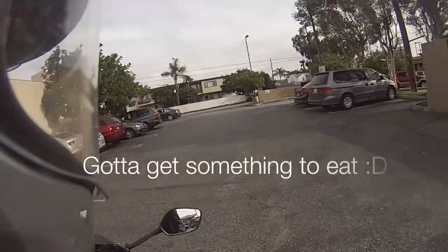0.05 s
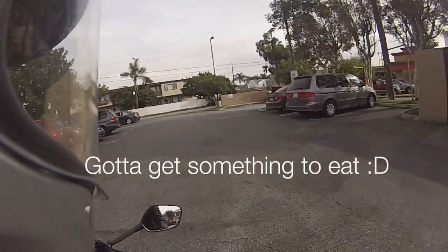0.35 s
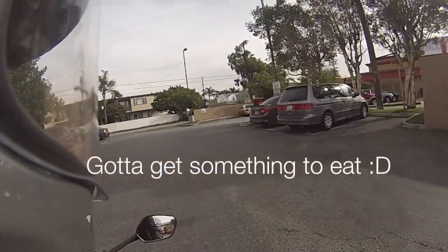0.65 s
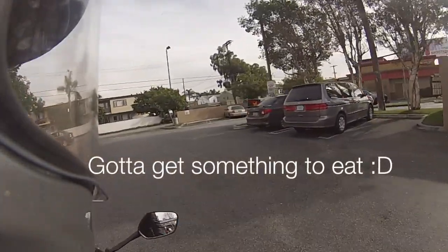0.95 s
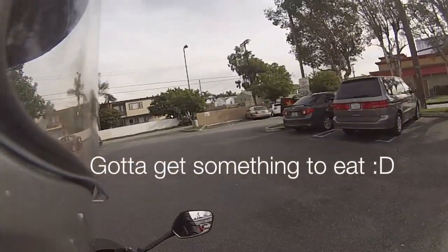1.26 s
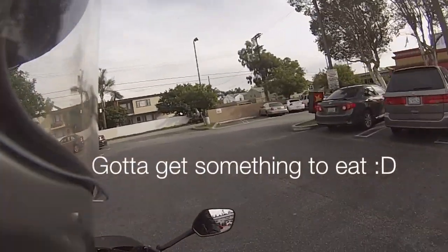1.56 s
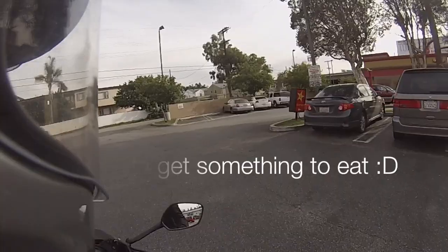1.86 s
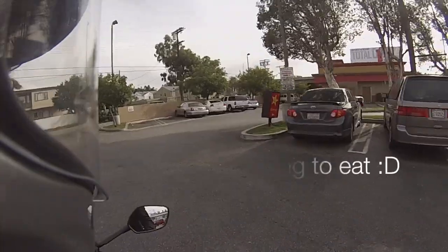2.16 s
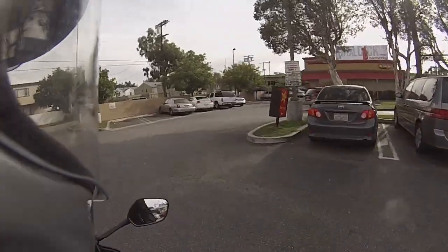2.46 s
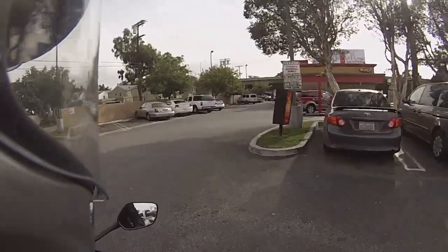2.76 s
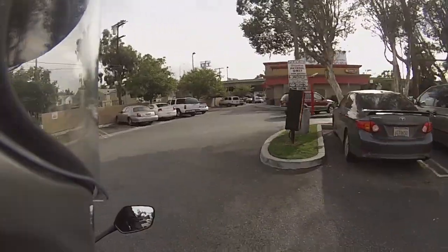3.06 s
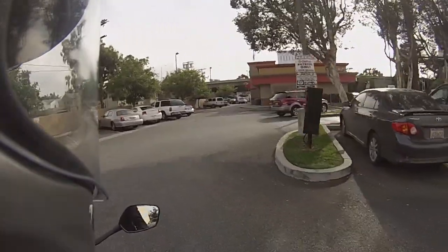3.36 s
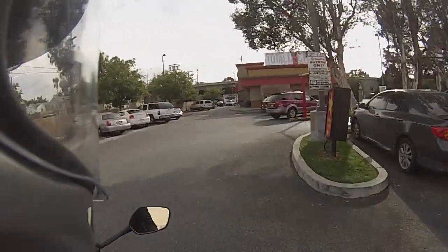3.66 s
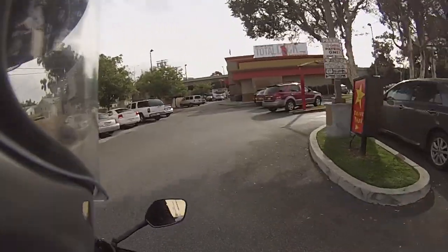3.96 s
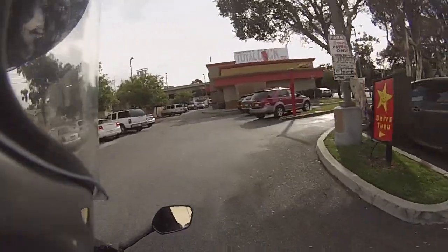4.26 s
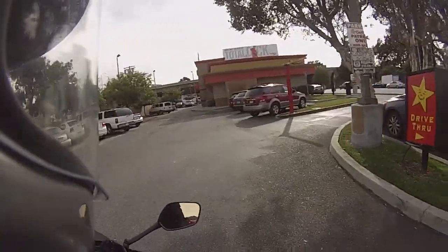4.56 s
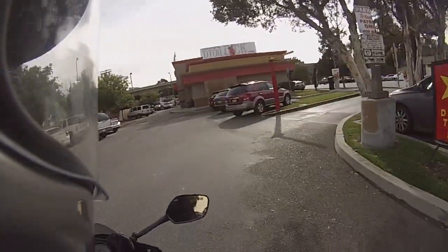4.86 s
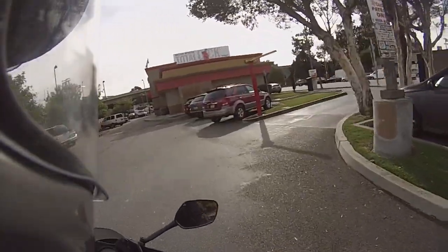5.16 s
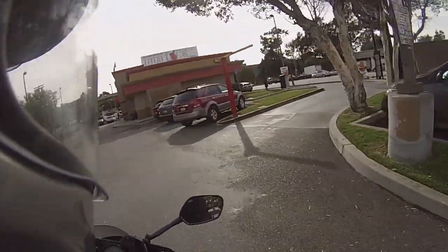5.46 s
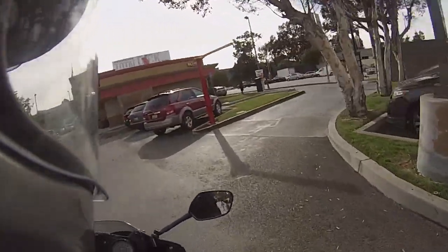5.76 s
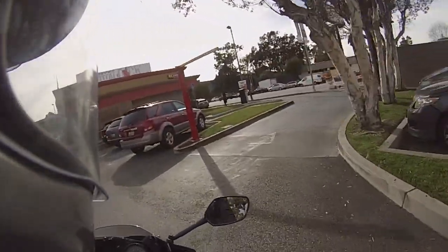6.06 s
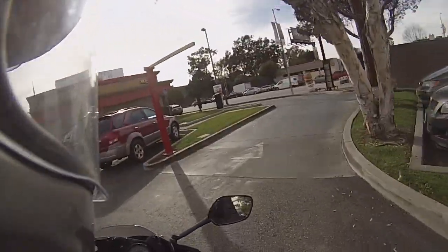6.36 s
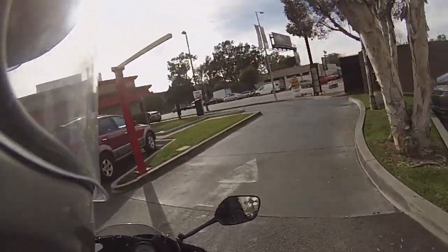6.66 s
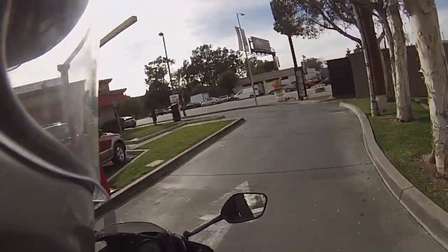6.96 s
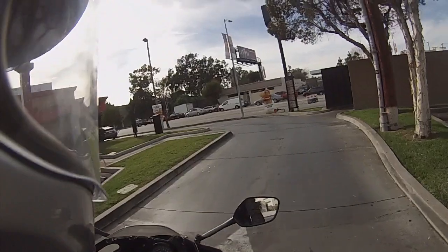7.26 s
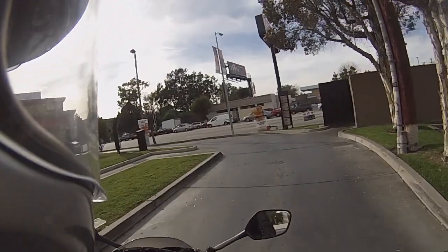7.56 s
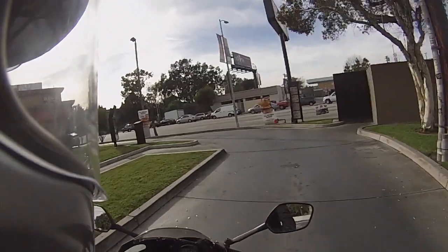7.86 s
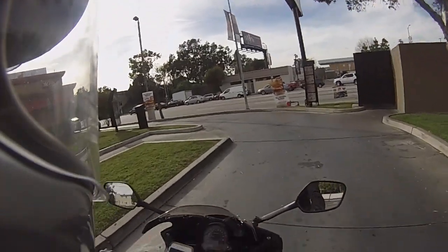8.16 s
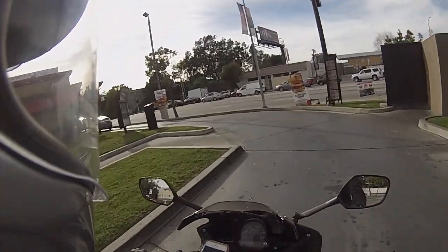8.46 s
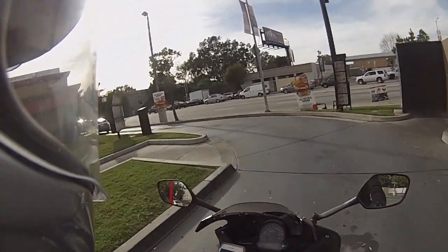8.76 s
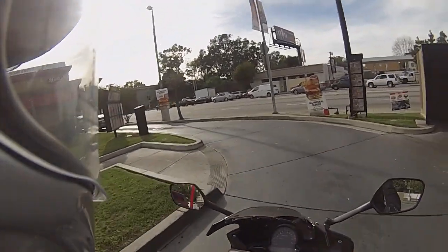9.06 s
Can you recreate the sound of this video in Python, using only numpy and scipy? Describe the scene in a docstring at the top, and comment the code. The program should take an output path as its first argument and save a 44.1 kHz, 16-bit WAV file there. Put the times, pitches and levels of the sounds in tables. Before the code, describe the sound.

A single-cylinder motorcycle rides slowly through a car park, heard from the rider's helmet. Low exhaust beats, mechanical clatter and a thin gear whine run under bassy gusts and sudden slaps of wind. The bike coasts, shifts down with a faint click and sinks to idle, then pulls away with rising pitch. It gradually slows again, and the brake pads rub softly near the end.

```python
"""A single-cylinder motorcycle rolls through a car park, heard from the rider's helmet.
From the start, gusts buffet the helmet and boom in its shell over exhaust beats, clatter and gear whine.
At 0.3 s the engine sound ducks suddenly after a loud wind slap.
The bike coasts, drops a gear at 1.7 s, idles with the clutch in and pulls away just after 4 s.
From 6 s it slows again, and after 8 s the brake pads rub on the disc."""
import sys
import numpy as np
from scipy import signal
from scipy.fft import rfft, irfft, next_fast_len
from scipy.io import wavfile
from scipy.ndimage import uniform_filter1d, minimum_filter1d, map_coordinates

SR = 44100
rng = np.random.default_rng(int(sys.argv[2]) if len(sys.argv) > 2 else 0)


def persist_wave(psi):
    """Save psi, clipped to +-1, as 16-bit WAV."""
    counts = np.round(np.clip(psi, -1, 1) * 32767).astype(np.int16)
    wavfile.write(sys.argv[1], SR, np.atleast_2d(counts).T)


N = 406602

# Drive laws: level/dB coasting at cruise, dB added per doubling of speed, dB added at full load
PUFF_LAW, DRONE_LAW = (-32.5, 0, 4.6), (-32.5, 16, 7.4)
# Tone of the exhaust pipe: f/Hz, relative level/dB
PIPE_EQ = [(15, -33), (50, -3), (75, -2.5), (120, 0.5), (170, -5), (400, -26.5), (2500, -87)]
# Silencer resonances: f/Hz, half width/Hz, relative level/dB
SILENCER_MODES = [(52.3, 3.9, -0.5), (100, 15, -3), (123.4, 4.8, -3), (163, 17, -6.5)]


def exhaust(cycle, speed, load, scatter_db, waver_db, jitter):
    """One uneven puff per firing; each low order booms as it sweeps through a silencer resonance."""
    firings = np.flatnonzero(np.diff(np.floor(cycle + jitter * wobble(22))))
    puffs = np.zeros(N)
    puffs[firings] = amp(scatter_db * rng.standard_normal(len(firings)))
    drone = np.zeros(N)
    for order in range(2, 8):
        boom = sum(amp(db) * resonance(order * speed, hz, width) for hz, width, db in SILENCER_MODES)
        waver = amp(waver_db * wobble(7.6))
        drone += boom * waver * np.sin(2 * np.pi * (order * cycle + rng.random()))
    beats = drive(PUFF_LAW, speed, load) * coloured(puffs, PIPE_EQ)
    return beats + drive(DRONE_LAW, speed, load) * drone


CLATTER_LAW, HISS_LAW = (-48.5, 8, 8.9), (-63.5, 10.4, 10.3)
# Midrange body of the engine casing: f/Hz, relative level/dB
CASING_EQ = [(150, -32.5), (400, -8.5), (620, 3.5), (875, -4.5), (1400, -5.5), (2100, -4.5), (2280, -2),
             (2600, -14), (3200, -25), (6000, -58)]
# Top-end fizz of the moving parts: f/Hz, relative level/dB
HISS_EQ = [(1800, -24.5), (2900, -1), (3550, 2.5), (3850, -4.5), (4200, 1), (4950, -3.5), (5550, 1),
           (5900, -3), (6350, -3), (6800, -9.5), (8100, -17), (9400, -9), (10600, -9), (15000, -26.5)]


def clatter(cycle, speed, load, firing_depth, crank_depth):
    """Valves, piston and chain rattle the casing, swelling at each firing and each crank turn."""
    swell = 1 + firing_depth * np.cos(2 * np.pi * cycle) + crank_depth * np.cos(4 * np.pi * cycle)
    body = coloured(noise() * swell, CASING_EQ)
    fizz = coloured(noise() * np.sqrt(np.abs(swell)), HISS_EQ)
    return drive(CLATTER_LAW, speed, load) * body + drive(HISS_LAW, speed, load) * fizz


# Fader for the loose rattle, loudest at the start, until the sound ducks at 0.3 s: t/s, level/dB
RATTLE_FADER = [(0, -40), (.28, -42), (.36, -45), (1.1, -47.5), (2.2, -62), (3.1, -53.5), (4.3, -51.5),
                (5, -50), (7.1, -53.5), (7.9, -59.5)]
# Casing modes that the rattle rings: f/Hz, half width/Hz, relative level/dB
RATTLE_MODES = [(1103, 75, 2.5), (1514, 79, -7), (2310, 65, -3.5), (3580, 110, -23)]


def rattle(cycle, lead, decay, scatter_db):
    """Loose parts chatter ahead of each firing and ring the casing; lead and decay are cycle shares."""
    bursts = np.exp(-((cycle + lead) % 1) / decay)
    chatter = noise() * bursts * amp(scatter_db * wobble(20))
    hz = np.geomspace(500, 9000, 400)
    ring = sum(amp(db) * resonance(hz, centre, width) for centre, width, db in RATTLE_MODES)
    ring_eq = np.column_stack([hz, 20 * np.log10(ring)])
    return amp(curve(RATTLE_FADER)) * coloured(chatter, ring_eq)


# Fader for the engine's hollow ring: t/s, level/dB
HOLLOW_FADER = [(0, -41.5), (2.9, -41.5), (5.1, -36), (5.35, -41), (6.1, -37), (6.6, -34), (7.8, -38),
                (9.22, -41)]


def hollow_ring(cycle, centre_hz, half_width_hz, firing_depth):
    """A hollow ring at one pitch, stirred by every firing; it carries on at idle."""
    stir = noise() * (1 + firing_depth * np.cos(2 * np.pi * cycle))
    ring = bandpass(stir, centre_hz - half_width_hz, centre_hz + half_width_hz)
    return amp(curve(HOLLOW_FADER)) * unit(ring)


GEARBOX_LAW, PRIMARY_LAW = (-51.5, 17, 7.5), (-47.5, 15, 5.7)
# Gearbox partials: multiple of the firing rate, relative level/dB
GEARBOX_ORDERS = [(52, 0), (104, 1.5), (158, -2), (209, -2.5)]
# Primary gear partials: multiple of the firing rate, relative level/dB
PRIMARY_ORDERS = [(34, -1.5), (36, -8), (65, -7), (69.5, 0), (74, -4), (139, -2)]
# Ringing tone of the engine covers: f/Hz, relative level/dB
COVERS_EQ = [(700, -3.5), (795, 18), (880, -3), (1010, -2), (1110, 7), (1190, 2), (1360, 4), (1470, -4),
             (1820, 4), (2100, -8), (2330, 5), (2650, -14), (2725, -6.5), (2810, -16), (3600, -8),
             (3880, -21.5), (4090, -9), (4300, -19.5)]


def gear_whine(cycle, speed, orders, backlash, waver_db=1.8):
    """Meshing teeth whine through the engine covers, roughened by backlash."""
    # the crank lurches each turn and wanders, smearing the high orders most, and more at speed
    lurch = .0018 * (speed / CRUISE_RATE) ** 2
    angle = cycle + lurch * (np.sin(4 * np.pi * cycle) + wobble(35) / 2)
    whine = np.zeros(N)
    for order, db in orders:
        phase = 2 * np.pi * order * angle
        gain = amp(db + waver_db * wobble(8))
        grit = wobble(130) * np.sin(phase) + wobble(130) * np.cos(phase)
        whine += gain * (np.sin(phase) + backlash * grit)
    return coloured(whine, COVERS_EQ)


# Gusts on the helmet: start t/s, length/s, level/dB
GUSTS = [(0.188, 0.17, -18.5), (0.271, 0.071, -17), (0.412, 0.075, -16.5), (0.499, 0.39, -20.5),
         (0.628, 0.051, -16), (0.971, 0.32, -17), (1.298, 0.18, -15.5), (1.468, .074, -15),
         (1.687, 0.58, -20.5), (1.776, .24, -16), (2.066, .12, -18.5), (2.31, 0.36, -23),
         (2.614, 0.31, -17.5), (3.194, 0.3, -22), (3.504, 0.47, -30.5), (3.933, 0.49, -17.5),
         (4.145, 0.14, -18), (4.804, 0.33, -23), (5.416, 0.3, -17), (5.738, 0.1, -13), (5.954, .07, -15.5),
         (6.377, 0.26, -21), (6.696, 1.9, -23), (7.325, 0.18, -17), (7.712, 0.083, -15.5),
         (8.42, 0.93, -20.5), (8.852, 0.42, -21.5)]


def gusts(calm_db):
    """Envelope of overlapping gusts over light, steady buffeting."""
    power = np.full(N, amp(calm_db) ** 2)
    for start, length, db in GUSTS:
        span, shape = gate(start, length, rise=.3, fall=.37)
        power[span] += (amp(db) * shape) ** 2
    return np.sqrt(power)


# The hardest slaps of air: t/s, envelope peak level/dB
SLAPS = [(0.307, -4.5), (0.417, -12.5), (0.45, -7), (1.179, -2.5), (1.853, -9.5), (1.975, -12),
         (2.211, -10.5), (2.677, -8), (2.755, -12.5), (2.862, -12), (3.193, -8.5), (3.21, -5.5),
         (3.248, -6), (4.059, -5.5), (4.179, -7.5), (7.411, -6.5), (7.455, -11), (7.795, -10),
         (8.198, -9.5), (8.645, -13.5), (9.135, -11.5)]


def slaps(attack_s, decay_s):
    """Envelope of air slaps that land at once and die away."""
    envelope = np.zeros(N + SR)
    near = np.arange(-SR // 10, SR // 10)
    shape = np.exp(np.minimum(near / SR / attack_s, -near / SR / decay_s))
    for s, db in SLAPS:
        envelope[round(s * SR) + near] += amp(db) * shape
    return envelope[:N]


# Bass-heavy tone of the buffeting: f/Hz, relative level/dB
BUFFET_EQ = [(40, -8), (90, -2.5), (190, -0.55), (280, -2.5), (400, -6.5), (600, -7), (830, -21),
             (1400, -41), (2200, -53), (4000, -82.5)]
# Boxy tone of the helmet shell: f/Hz, relative level/dB
SHELL_EQ = [(200, -34), (420, -9.5), (520, -4.5), (575, -3), (618, 1), (680, -6), (850, -21.5), (1300, -49),
            (3000, -86.5)]
# Fader for the shell's boom: t/s, level/dB against the buffeting
BOOM_FADER = [(0, -5.5), (1.2, -7), (2.15, -2.5), (3, -7), (4, -9), (7, -7), (8.2, -3.5), (9, -0.5)]


def helmet_wind(eddy_db, flutter_db):
    """Eddies break off the helmet in quick lumps and boom in its shell; the hardest ones slap it."""
    eddies = amp(eddy_db * wobble(190) + flutter_db * wobble(32))
    force = np.hypot(gusts(calm_db=-25.5) * eddies, slaps(attack_s=.0014, decay_s=.0073))
    buffet = coloured(noise() * force, BUFFET_EQ)
    boom = amp(curve(BOOM_FADER)) * coloured(noise() * force, SHELL_EQ)
    return np.sqrt(np.mean(force ** 2)) * (buffet + boom)


# Low end of the steady draught: f/Hz, relative level/dB
DRAUGHT_EQ = [(10, -20.5), (25, -4), (50, -3.5), (90, 0.5), (150, -8), (800, -83.5)]
# Swells of deep wind: start t/s, length/s, level/dB, centre f/Hz
SWELLS = [(0.238, .12, -19.5, 49.2), (0.699, 0.66, -19.5, 77.6), (2.699, 0.3, -19, 74),
          (3.165, .2, -17, 73), (3.347, .45, -22, 48.3), (3.948, .35, -18.5, 89), (5.424, .45, -17.5, 56),
          (6.817, .4, -18, 111), (7.216, 0.29, -19, 67.5), (7.306, 0.9, -21.5, 148),
          (7.725, .2, -18.5, 102), (8.945, .2, -21, 98)]


def wind_rumble(draught_db, band_ratio):
    """A bed of deep draught, and swells of wind that each rumble at their own pitch."""
    out = amp(draught_db) * coloured(noise(), DRAUGHT_EQ)
    for start, length, db, hz in SWELLS:
        span, shape = gate(start, length, rise=.43, fall=.43)
        band = bandpass(rng.standard_normal(N // 2), hz / band_ratio, hz * band_ratio)
        out[span] += amp(db) * shape * unit(band[:len(shape)])
    return out


# Fader for the pads pressing on the disc: t/s, level/dB
BRAKE_FADER = [(.25, -76), (.45, -58.5), (1.1, -63.5), (1.9, -70), (2.3, -78.5), (8.1, -75), (8.3, -53.5),
               (8.55, -46.5), (9.22, -47)]
# Bright ring of the brake disc: f/Hz, relative level/dB
DISC_EQ = [(1200, -23), (2200, 8.5), (2750, -0.5), (2920, 10), (3100, -2), (3700, -6.5), (5300, -3),
           (5570, 7), (5850, -5), (6400, -5), (7500, -21), (12000, -31)]


def brake():
    """The pads rub lightly on the disc as the bike slows."""
    return amp(curve(BRAKE_FADER)) * coloured(noise(), DISC_EQ)


# Gear lever clicks: peak t/s, level/dB, centre f/Hz, half width/Hz, half length/s
LEVER_CLICKS = [(1.718, -55, 1000, 8000, .014), (3.356, -67, 10500, 3000, .005)]


def gear_lever():
    """Short metallic scrapes of the gear lever and its linkage."""
    t, hz = np.arange(N) / SR, np.fft.rfftfreq(N, 1 / SR)
    out = np.zeros(N)
    for s, db, centre_hz, half_width_hz, half_length in LEVER_CLICKS:
        band = np.exp(-((hz - centre_hz) / half_width_hz) ** 2)
        scrape = unit(irfft(rfft(noise()) * band, N))
        out += amp(db) * scrape * np.exp(-((t - s) / half_length) ** 2)
    return out


CRUISE_RATE = 21  # firings per second


def drive(law, speed, load):
    """Gain of an engine layer at this speed and load."""
    coasting_db, doubling_db, load_db = law
    return amp(coasting_db + doubling_db * np.log2(speed / CRUISE_RATE) + load_db * load)


def amp(db):
    """Decibels to gain."""
    return 10 ** (np.asarray(db) / 20)


def unit(x):
    """Scale to rms 1."""
    return x / np.sqrt(np.mean(x ** 2) + 1e-20)


def noise():
    """Fresh white noise."""
    return rng.standard_normal(N)


def curve(rows):
    """Join (time, value) breakpoints, one value per sample."""
    return np.interp(np.arange(N) / SR, *np.transpose(rows))


def wobble(rate):
    """Smooth random modulation, rate knots a second."""
    coarse = np.arange(0, N + 32, 32)
    knots = rng.standard_normal(int(N * rate / SR) + 4)
    bends = map_coordinates(knots, [coarse * rate / SR])
    return unit(np.interp(np.arange(N), coarse, bends))


def gate(start, length, rise, fall):
    """Samples covered and their envelope; rise and fall are shares of the length."""
    first, last = int((start - length / 2) * SR), int((start + 1.5 * length) * SR)
    span = np.arange(max(0, first), min(N, last))
    progress = (span / SR - start) / length
    return span, np.clip(.5 + progress / rise, 0, 1) * np.clip(.5 + (1 - progress) / fall, 0, 1)


def resonance(x, centre, half_width):
    """A peak of height 1 at the centre."""
    return 1 / (1 + ((x - centre) / half_width) ** 2)


def bandpass(x, low_hz, high_hz):
    """Keep one band, with gentle slopes."""
    return signal.sosfilt(signal.butter(2, [low_hz, high_hz], "bandpass", fs=SR, output="sos"), x)


def coloured(x, eq):
    """Pass x through a body with this EQ curve; rms 1."""
    size = 2 * next_fast_len(N // 2 + 8192)
    hz, db = np.transpose(eq)
    gain = amp(np.interp(np.log(np.fft.rfftfreq(size, 1 / SR) + 1), np.log(hz), db))
    # minimum phase: the body rings only after it is struck
    cepstrum = irfft(np.log(gain))
    cepstrum[1:size // 2] *= 2
    cepstrum[size // 2 + 1:] = 0
    return unit(irfft(rfft(x, size) * np.exp(rfft(cepstrum)))[:N])


# Engine revs: t/s, firing rate f/Hz
ENGINE_SPEED = [(0, 21.9), (.35, 21.1), (1.5, 21), (1.8, 22.8), (2.2, 14.5), (2.7, 12.7), (3.8, 12.4),
                (4.2, 13.8), (4.6, 23.4), (4.95, 25.9), (5.55, 26.2), (6, 25), (7.6, 21.1), (7.9, 19.3),
                (8.2, 18.3), (8.5, 19.8), (8.8, 18.3), (9.22, 18)]
# Engine loudness, following the pull and ducking abruptly twice after loud wind peaks:
# t/s, load (0 = coasting level, about 1 = pulling level)
ENGINE_LOUDNESS = [(0, 0.83), (.3, 0.7), (.33, -0.023), (1.05, 0.26), (1.6, -0.41), (1.8, -0.066),
                   (2.2, -0.34), (3.4, 0.29), (4.05, 0.93), (4.21, .8), (4.24, -0.19), (4.6, 0.22),
                   (4.95, 0.83), (5.9, 0.81), (7.3, 1.03), (8.25, 1.08), (9.22, 1.13)]


def scene():
    """Speed and load drive exhaust, clatter and gears; wind blows over all of it."""
    speed, load = curve(ENGINE_SPEED), curve(ENGINE_LOUDNESS)
    cycle = np.cumsum(speed) / SR  # one firing and two crank turns per cycle
    engine = exhaust(cycle, speed, load, scatter_db=2, waver_db=1.5, jitter=.015)
    engine += clatter(cycle, speed, load, firing_depth=.14, crank_depth=.098)
    engine += rattle(cycle, lead=.33, decay=.42, scatter_db=1)
    engine += hollow_ring(cycle, centre_hz=795, half_width_hz=24, firing_depth=.3)
    gearbox = gear_whine(cycle, speed, GEARBOX_ORDERS, backlash=.7)
    primary = gear_whine(cycle, speed, PRIMARY_ORDERS, backlash=.4)
    primary *= amp(2.7 * resonance(speed, centre=18.2, half_width=.37))  # sings at one low speed
    engine += drive(GEARBOX_LAW, speed, load) * gearbox + drive(PRIMARY_LAW, speed, load) * primary
    air = helmet_wind(eddy_db=2.1, flutter_db=.82) + wind_rumble(draught_db=-27, band_ratio=1.605)
    return (engine + brake() + gear_lever() + air)[None]


def record(dry):
    """Master chain: a limiter rounds off the highest peaks, the ends fade, the extreme top is cut."""
    ceiling, fade_s, top_hz = .87, .004, 15150
    needed = np.minimum(1, ceiling / (np.abs(dry) + 1e-9))
    gain = uniform_filter1d(minimum_filter1d(needed, size=601), size=601)
    fade = np.minimum(1, np.minimum(np.arange(N), np.arange(N)[::-1]) / (fade_s * SR))
    return irfft(rfft(dry * gain * fade) * (np.fft.rfftfreq(N, 1 / SR) < top_hz), N)


dry = scene()
out = record(dry)
persist_wave(out)
```